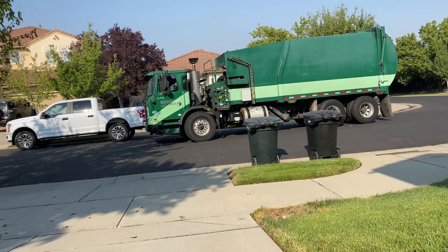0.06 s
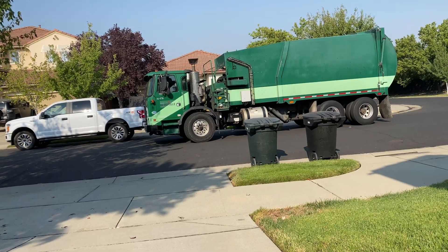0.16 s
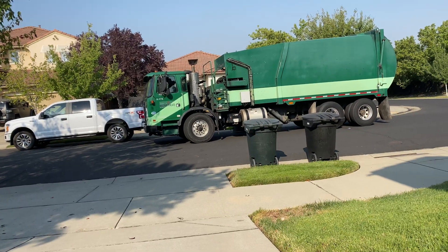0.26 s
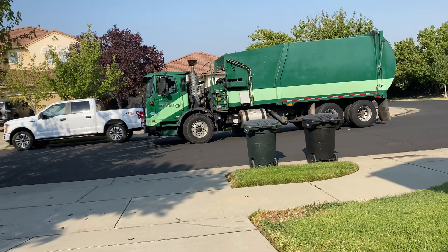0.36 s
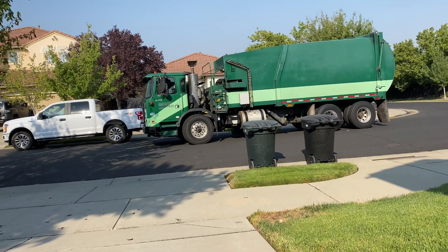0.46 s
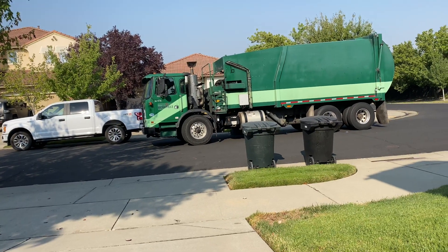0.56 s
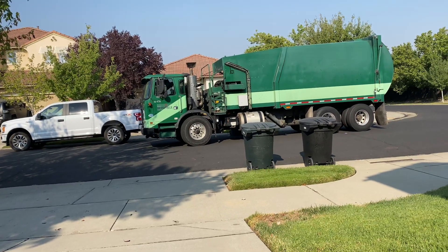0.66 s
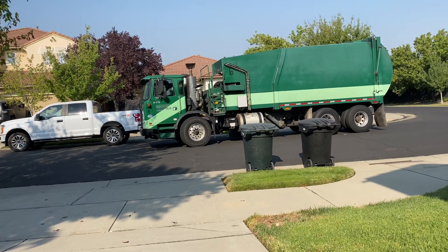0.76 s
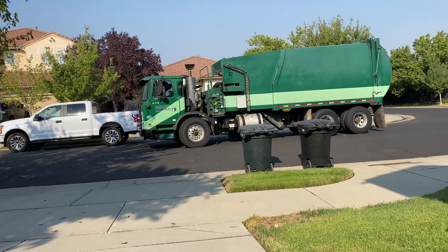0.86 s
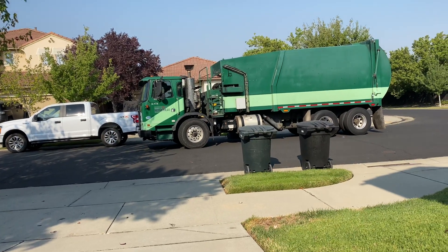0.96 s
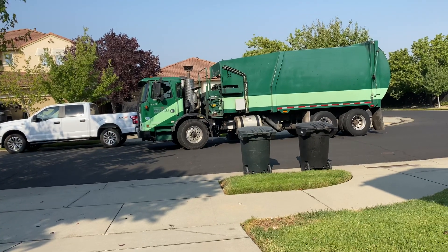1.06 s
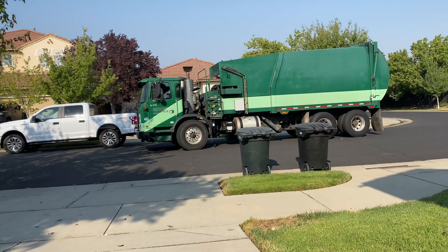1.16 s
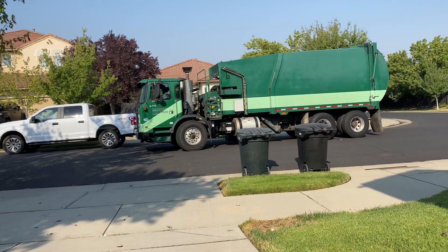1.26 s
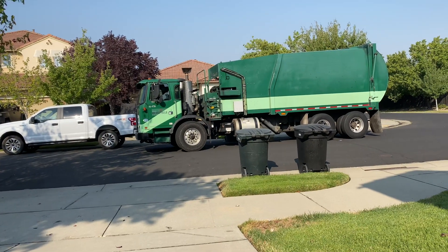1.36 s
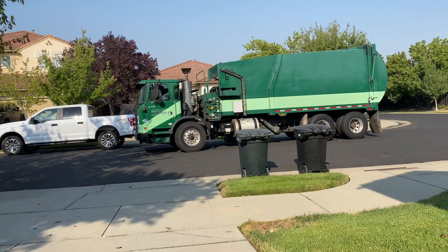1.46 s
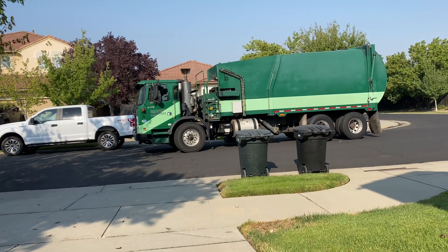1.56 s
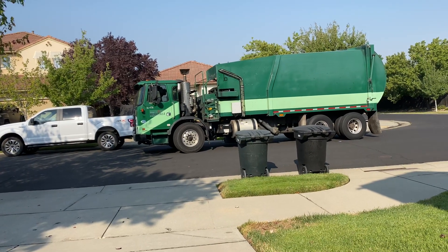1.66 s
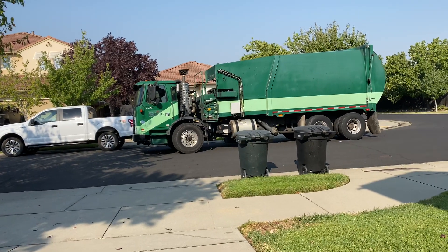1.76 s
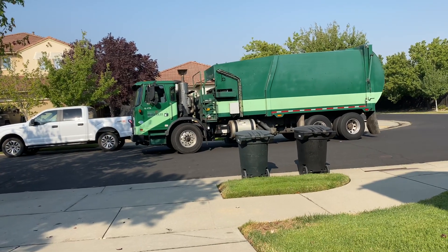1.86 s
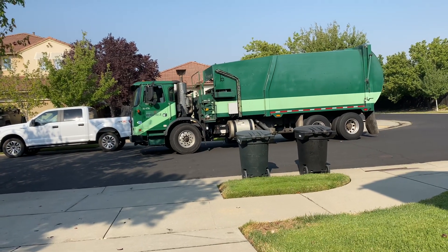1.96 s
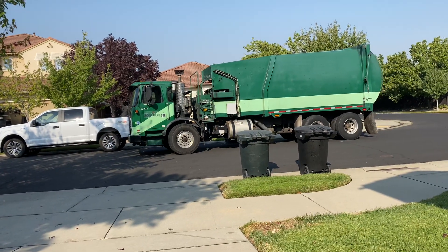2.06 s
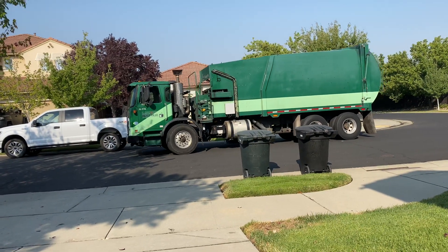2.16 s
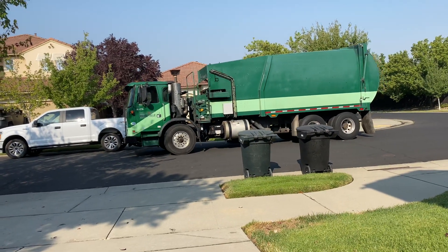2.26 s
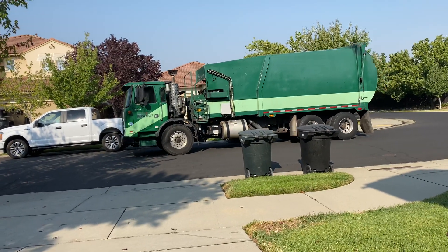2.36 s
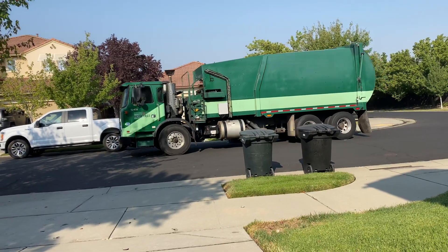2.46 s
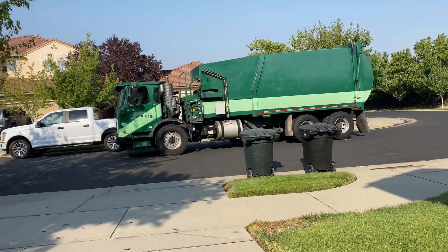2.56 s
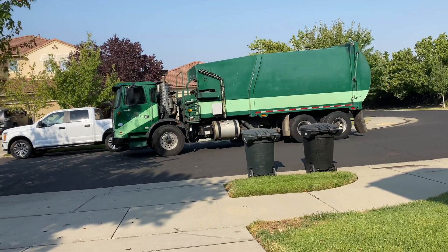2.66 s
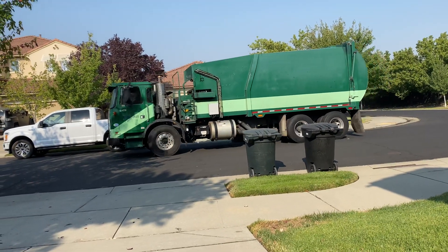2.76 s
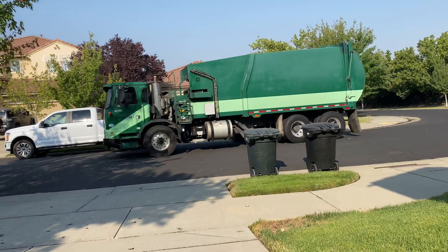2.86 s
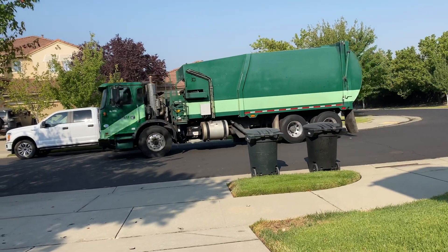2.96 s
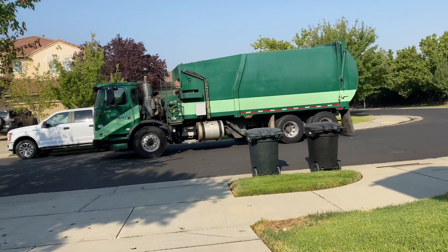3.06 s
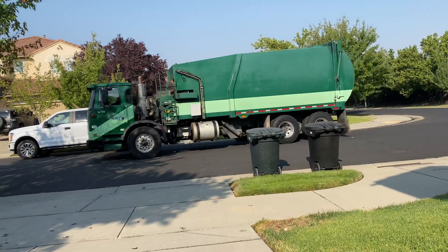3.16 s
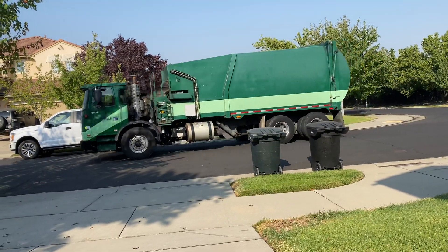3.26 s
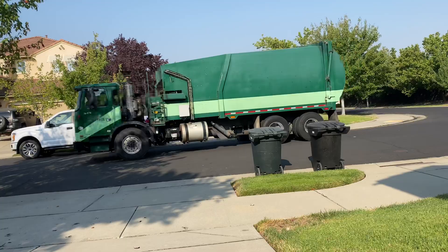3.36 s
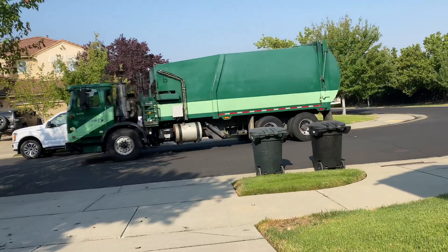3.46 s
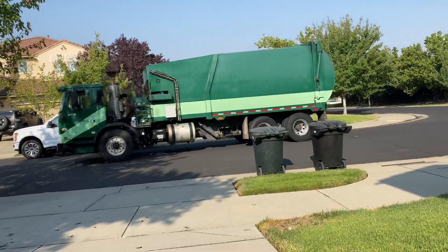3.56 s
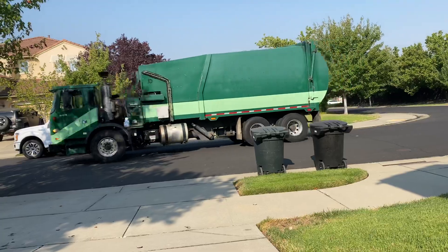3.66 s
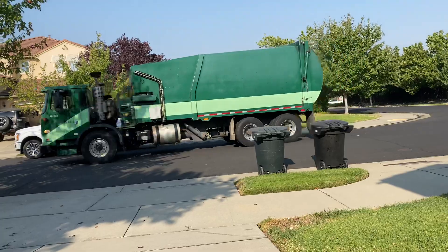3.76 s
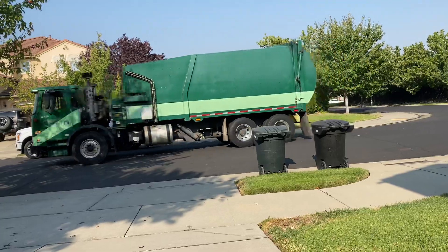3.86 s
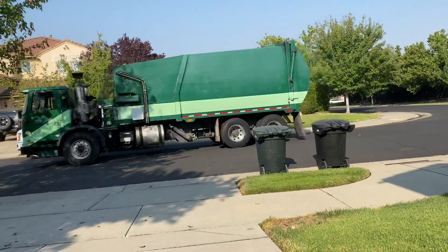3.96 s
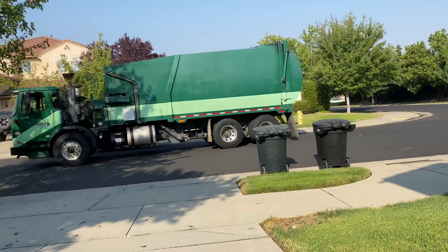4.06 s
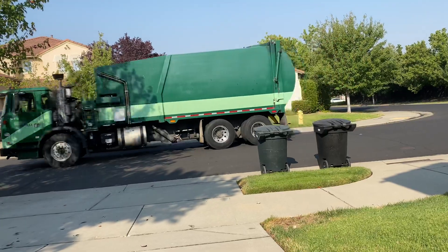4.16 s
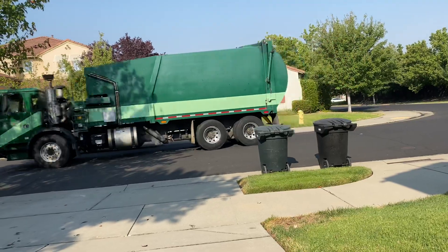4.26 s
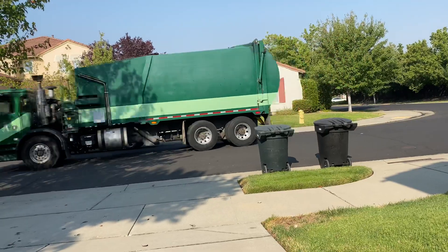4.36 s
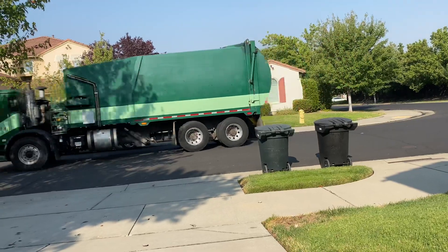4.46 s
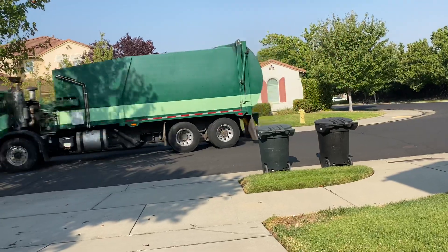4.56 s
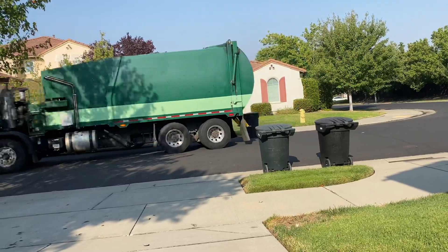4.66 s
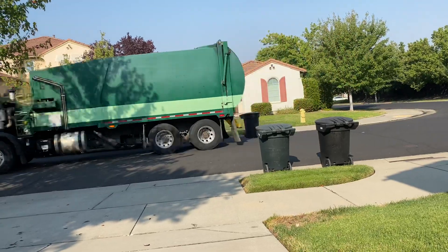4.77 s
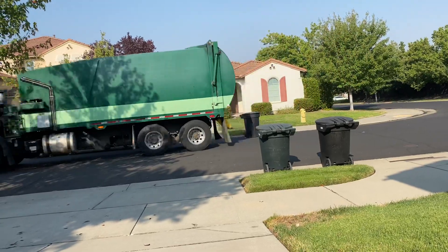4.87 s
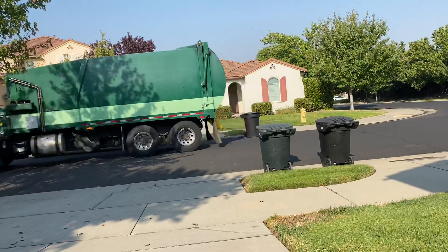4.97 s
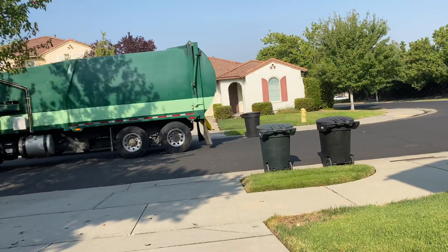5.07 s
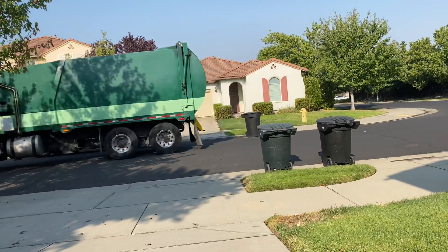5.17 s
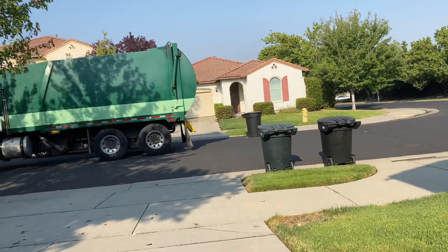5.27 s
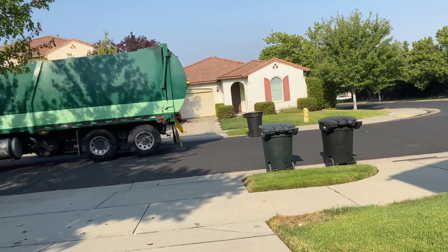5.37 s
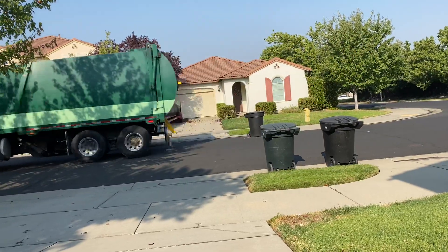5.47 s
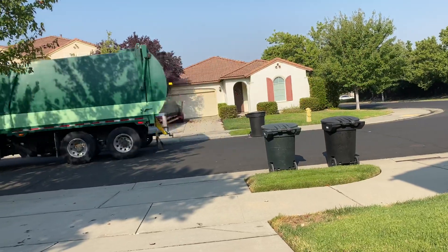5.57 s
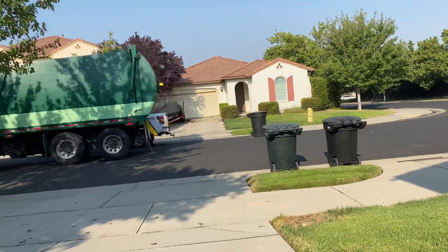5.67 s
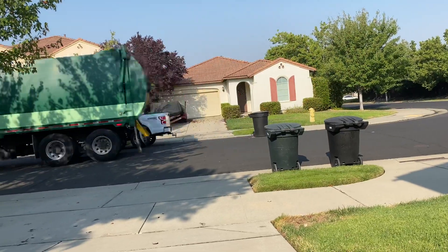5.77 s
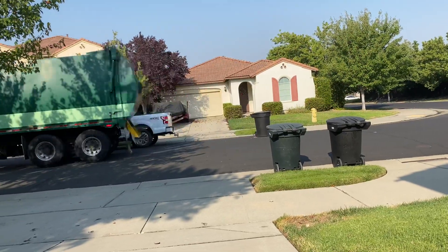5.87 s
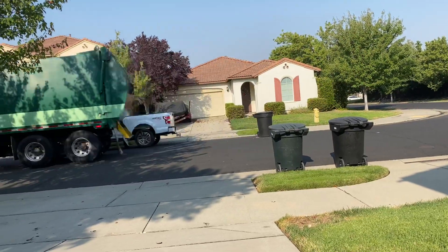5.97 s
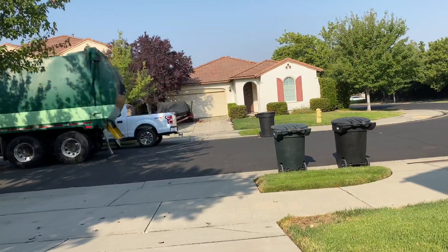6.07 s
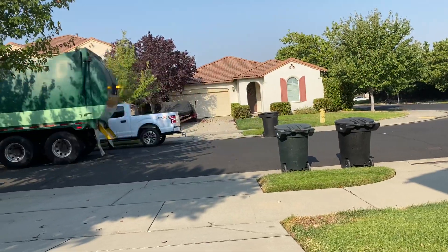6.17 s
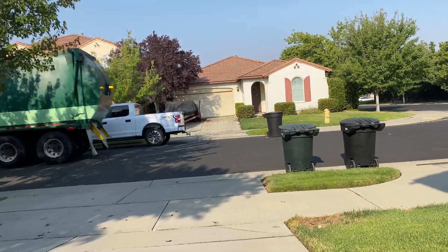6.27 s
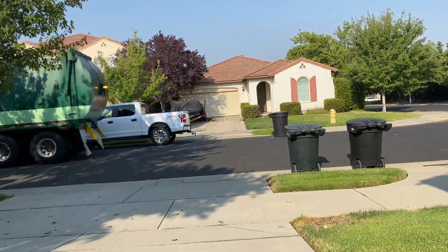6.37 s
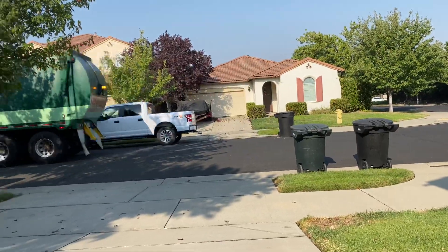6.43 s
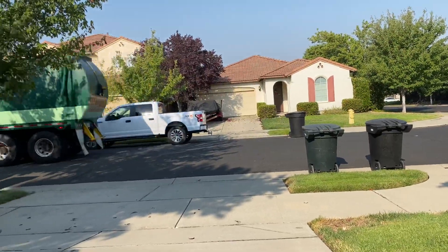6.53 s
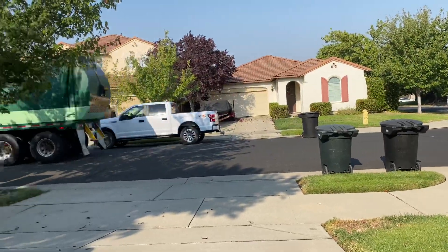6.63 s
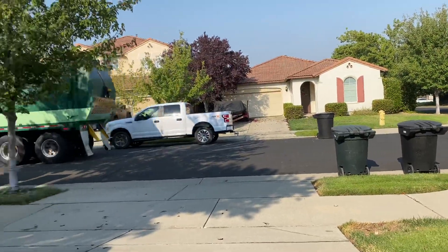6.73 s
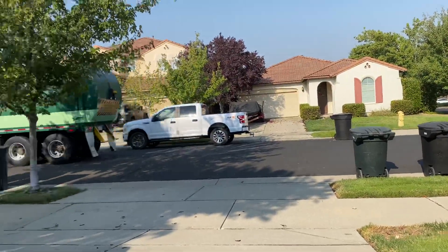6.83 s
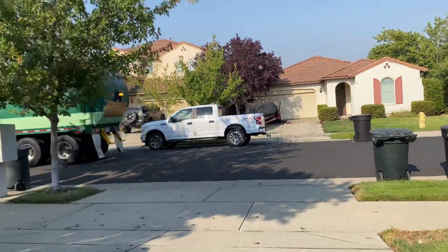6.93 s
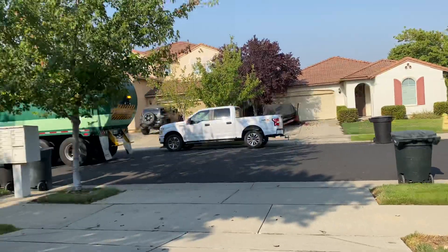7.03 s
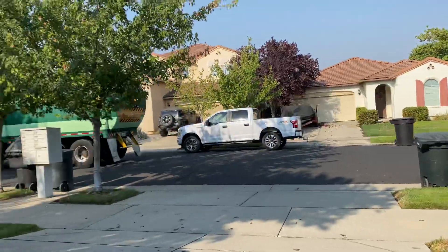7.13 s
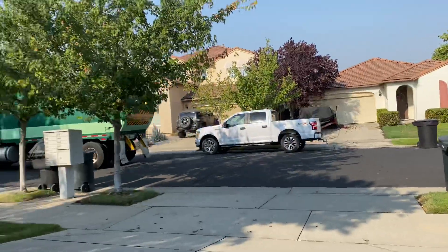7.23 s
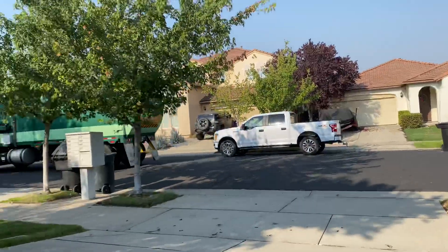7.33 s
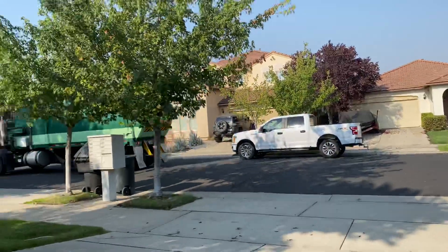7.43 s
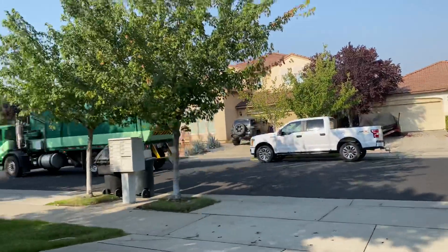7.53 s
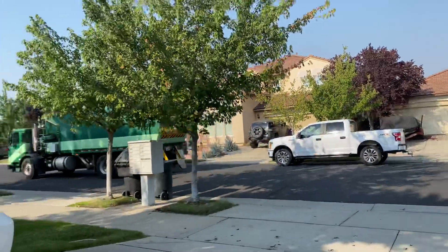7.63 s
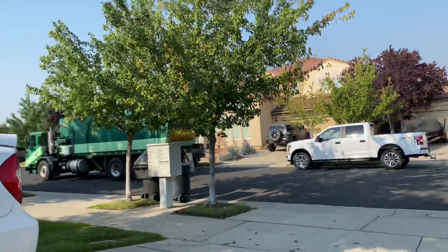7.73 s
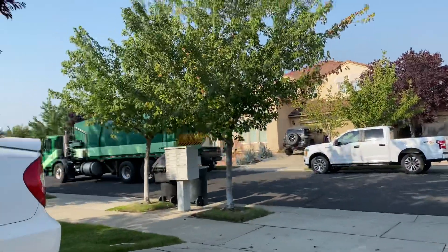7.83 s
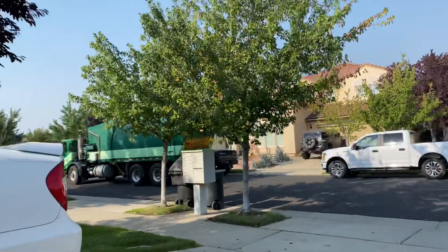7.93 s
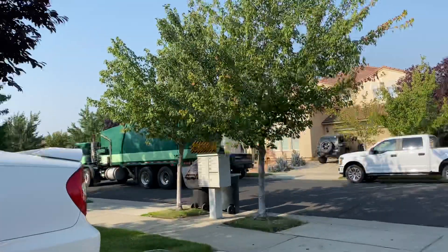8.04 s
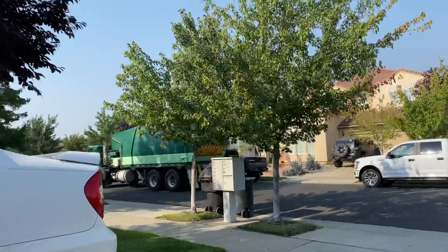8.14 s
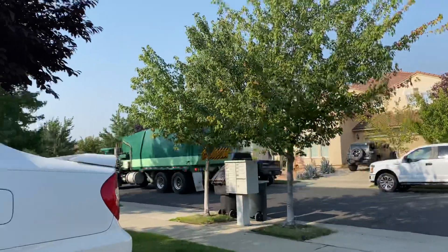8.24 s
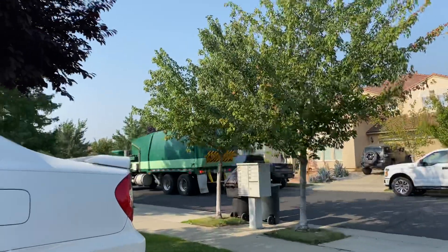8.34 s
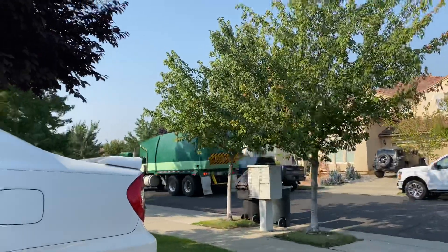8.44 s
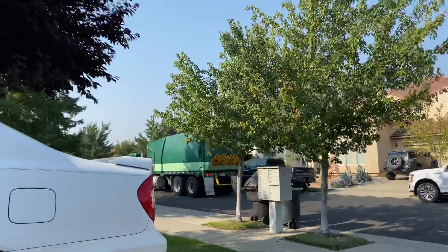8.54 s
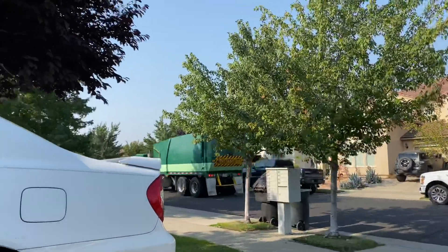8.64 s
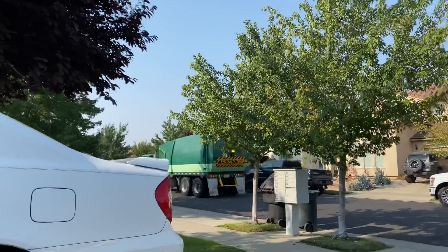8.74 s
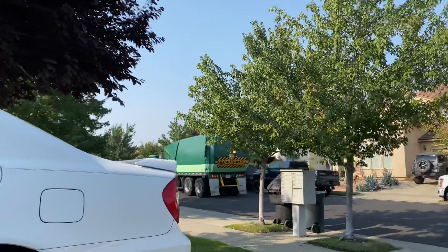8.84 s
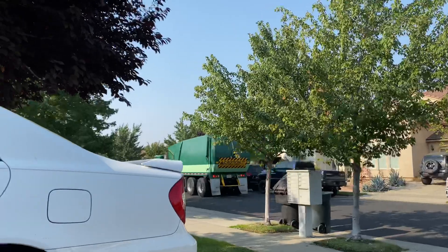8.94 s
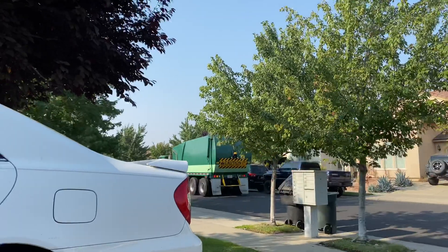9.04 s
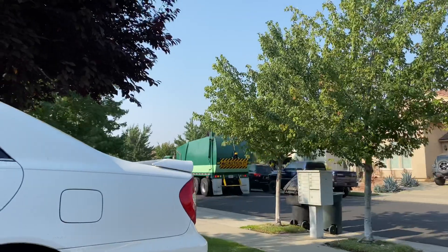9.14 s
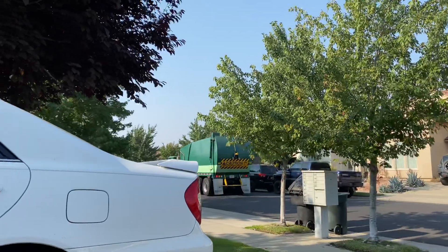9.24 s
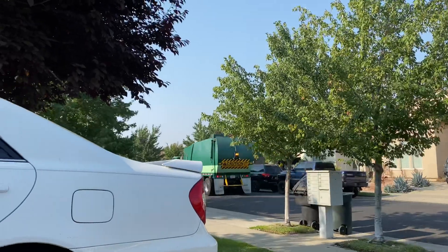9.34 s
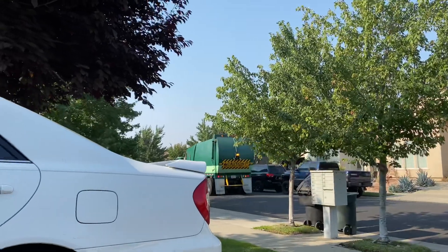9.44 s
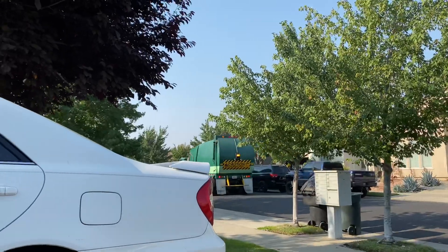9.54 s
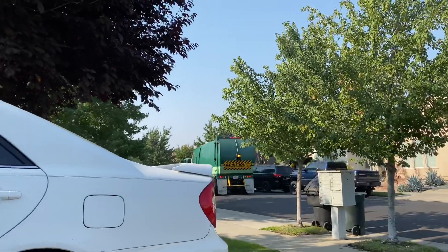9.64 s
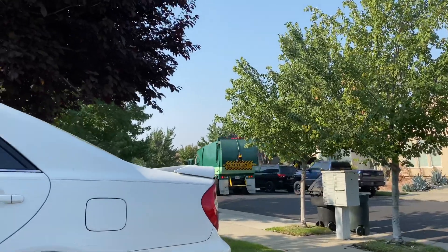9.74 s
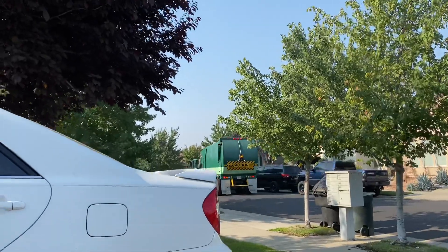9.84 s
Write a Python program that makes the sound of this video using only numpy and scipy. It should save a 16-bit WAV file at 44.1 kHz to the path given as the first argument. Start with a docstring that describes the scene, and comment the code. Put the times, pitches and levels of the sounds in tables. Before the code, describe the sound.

Outdoors, from a driveway, a handheld stereo microphone hears a heavy refuse truck on the opposite side of the road. It idles roughly, lets out air and bangs its lifting arm, then accelerates with a throaty diesel roar, whining hums and a faint turbo whistle. After passing left it drops in revs and grows distant, ending in thin brake squeaks and high squeals over a fading, low idle.

```python
"""Across a street, a refuse truck idles, vents its air brakes, bangs its lifting arm, revs past to the left and brakes
further off. Shaft-locked hums from pump and fan ride on exhaust rumble, drone, diesel clatter, fan hiss and fizz, all
noise shaped in spectrum. A turbo whistle follows the boost; short noise bursts clang and thump, and stick-slip makes
the brakes squeal very high at the end. Two close microphone ports hear it with a short diffuse tail of the street."""
import sys
import numpy as np
from scipy import signal
from scipy.fft import rfft, irfft, next_fast_len
from scipy.io import wavfile
from scipy.ndimage import map_coordinates

SR = 44100
rng = np.random.default_rng(int(sys.argv[2]) if len(sys.argv) > 2 else 0)


def nominal_scale(level):
    """Amplitude ratio for a level in decibels (scalar or array-like)."""
    x = np.asarray(level, float) / 20
    return 10 ** x


def wav_out(sig):
    """Save sig, one row per channel (or a flat mono array), as 16-bit PCM at SR to the path in sys.argv[1]."""
    wavfile.write(sys.argv[1], SR, np.round(np.clip(np.atleast_2d(sig).T, -1, 1) * 32767).astype(np.int16))


N = 436587  # length in samples

# crankshaft speed: time_s, turns_per_s
SHAFT_SPEED = [(0, 22.2), (.8, 21.8), (1.1, 23.67), (1.4, 24.26), (1.8, 22.8), (2.7, 21.94), (3.0, 24.75),
               (3.3, 26.67), (3.5, 27.36), (3.8, 27.06), (4.2, 28.89), (4.6, 30.15), (5.1, 31.43),
               (5.8, 32.94), (6.1, 31.84), (6.3, 28.67), (6.6, 26.22), (7.0, 25.71), (7.5, 25.4),
               (7.8, 24.69), (8.1, 22.44), (8.4, 18.05), (8.7, 18.47), (8.95, 15.69), (9.3, 13.13),
               (9.9, 11.89)]
# engine as heard across the street: time_s, load_and_nearness_db (re the loudest moment), screening_db (shift
# in how the body screens the engine bay, positive = less screened: lifts rumble, hiss and fizz, lowers drone;
# each layer weighs both levels by its own law)
ENGINE_STATE = [(0, -17.5, -6), (.75, -17, 5.5), (1.6, -15.5, 1), (2.1, -10.5, -4), (2.6, -7.5, -5.5),
                (3.1, -4.5, -1), (3.6, -2.5, -1), (4.3, -1, -1.5), (4.9, -1.5, -1.5), (5.5, -1.5, -3),
                (5.95, -5.5, -4), (6.3, -12.5, -10), (7.2, -12, -4.5), (7.7, -13, -11), (8.1, -20.5, -10),
                (8.4, -24, -9), (9, -28.5, -5), (9.9, -34.5, -6.5)]
# relative spectra of the noise layers, each brought to rms 1 before its level: frequency_hz, density_db
RUMBLE_SPECTRUM = [(20, -58), (30, -30), (50, -7), (80, -5), (106, 1), (135, -1.5), (175, -3.5),
                   (230, -8.5), (300, -14.5), (500, -65.5)]
DRONE_SPECTRUM = [(100, -32), (180, -2.5), (270, 0.5), (335, -6.5), (420, -5.5), (520, -8.5), (680, -22.5),
                  (1000, -57.5)]
CLATTER_SPECTRUM = [(400, -43), (680, -3), (950, -4), (1150, -1.5), (1300, -5), (1580, -6), (1780, -13.5),
                    (2400, -49.5)]
HISS_SPECTRUM = [(1300, -35), (1850, 0), (2500, 2.5), (3000, -4), (4500, -7.5), (7300, -16.5),
                 (9000, -12.5), (12000, -43)]
FIZZ_SPECTRUM = [(6500, -12), (8500, -8), (10500, -3.5), (12300, -7), (14000, -3.5), (15600, -15),
                 (15900, -69)]
AIR_SPECTRUM = [(500, -30), (1200, -5), (3000, -4.5), (6000, -8.5), (10900, -3.5), (13000, -13),
                (15600, -12), (15900, -60)]
# relative exhaust strength of the six cylinders in firing order: strength_db
CYLINDER_STRENGTHS = [0, -0.5, 0.5, -2.5, 2.5, -1]
# bouts in which the pump works against pressure: start_s, length_s, hum_db
PUMP_BOUTS = [(0.614, 0.75, -28.5), (2.906, .5, -16.5), (3.8, 0.34, -29), (5.157, 0.59, -16.5),
              (5.672, 0.414, -11), (6.1, 0.26, -20.5), (6.68, 0.84, -20.5), (8.25, 0.51, -28.5)]
# the one hold of the fan clutch: start_s, length_s, hum_db (before its waver)
FAN_HOLD = (2.606, 5.3, -25)
# turbo whistle: time_s, pitch_hz, level_db
TURBO_WHISTLE = [(3.5, 9700, -53), (3.9, 10100, -50), (4.3, 10340, -46), (4.9, 10560, -49),
                 (5.4, 10830, -44.5), (5.7, 10950, -52), (6, 10460, -53), (6.3, 9660, -62)]
# the long squeal between 14.5 and 15.4 kHz: time_s, pitch_hz, level_db
LONG_SQUEAL = [(8.57, 14620, -42), (8.62, 14680, -41), (8.7, 15160, -46), (8.77, 15200, -40),
               (8.88, 14520, -39), (9.05, 14700, -42), (9.2, 14900, -44), (9.28, 15370, -42),
               (9.42, 15320, -42), (9.5, 14800, -45), (9.66, 14800, -45), (9.78, 14600, -40),
               (9.9, 14580, -45)]
# other drum modes that break in and die away: start_s, length_s, pitch_hz, glide_hz, level_db
PASSING_SQUEALS = [(8.71, .09, 12880, 100, -48), (8.78, .2, 12100, 50, -41), (8.84, .25, 13720, 50, -50),
                   (9.02, .07, 12200, 50, -48), (9.16, .1, 12880, 20, -49), (9.22, .22, 14850, 50, -47),
                   (9.22, .46, 11550, 300, -37), (9.44, .36, 9950, 300, -62), (9.46, .24, 12950, 0, -52),
                   (9.56, .15, 15100, 250, -50), (9.68, .22, 13720, 250, -48), (9.76, .1, 6900, 250, -64)]
# short metal squeaks: start_s, length_s, pitch_hz, level_db (of the first partial), overtone_db (re first)
METAL_SQUEAKS = [(1.695, .1, 1610, -37, -26), (8.455, .08, 2300, -34.5, -8.5), (8.54, .07, 1915, -48, -25),
                 (8.633, .1, 2240, -51, -20), (8.85, .05, 2460, -49, -20), (9.301, .17, 2860, -55, -5)]
# short noise bursts and thumps, most from arm and panels, the one at 3.9 s a spit of air:
# start_s, level_db (before the gains below), thump_db (re level_db), decay_s (of the burst, to -60 dB)
BURSTS = [(.423, -26.5, -5, 0.56), (0.908, -21.5, -9, 0.13), (0.915, -26.5, 20.5, 0.18),
          (.932, -21.5, 16.5, 0.18), (0.946, -19, 10.5, 0.097), (0.959, -18, 13.5, 0.12),
          (.977, -25, 6, 0.33), (1.271, -30, -1.5, 0.3), (3.903, -10, -8, 0.1), (4.008, -25.5, 18, 0.25),
          (4.047, -22, 19.5, 0.24)]
# resonances of the steel body: pitch_hz, width_hz, relative_gain_db
PANEL_MODES = [(103.7, 8, 3.5), (139.3, 15, -5), (169, 17, -2.5), (260, 27, -10.5)]
# filter of the noise bursts: frequency_hz, gain_db
BURST_RESPONSE = [(300, 15), (700, 0.5), (1200, 7.5), (1900, 1.5), (2700, 0.5), (5000, -8.5), (8000, -14),
                  (15600, -31), (15900, -71)]
# brake air let out: start_s, rise_s, hold_s (from the start until it dies), level_db, decay_s (to -60 dB)
AIR_VENTS = [(.4, .035, 0.052, -39.5, 1.2), (1.19, 0.055, 0.2, -34.5, 0.16),
             (3.888, .02, 0.019, -31.5, .08)]
# scatter returned by the street: frequency_hz, gain_db
STREET_SCATTER = [(50, -29), (400, -11.5), (680, -2), (1100, -10.5), (1900, -1), (2500, -6), (4500, -1),
                  (6000, -2), (7800, -5.5), (15000, -10.5)]
# bearing of the truck: time_s, left_lead_samples (for the middle band)
LEFT_LEAD = [(0, 0), (1.7, .5), (3.2, 2.5), (4.2, 7.5), (5.7, 11), (6.9, 13), (7.8, 6.5), (8.7, 1),
             (9.9, -0.5)]
# level tilt between the ports: frequency_hz, left_minus_right_db
PORT_TILT = [(60, 0.6), (250, -2.5), (680, -5.5), (1600, -2), (2100, -2), (3200, 2.5), (4300, 2.1),
             (5900, 4), (8000, 1)]
# phase between left and right over frequency: frequency_hz, left_lead_rad
PORT_PHASE = [(20, 0), (450, -0.54), (700, 1.22), (1100, 0.5), (1700, 1.19), (2100, 0.65), (3400, 1.36),
              (4300, 0.5), (5400, 1.5), (6000, -1.74), (7000, 0.5), (7800, -np.pi), (8900, -np.pi),
              (10300, -2 * np.pi), (11600, -2 * np.pi), (12600, -9), (14200, -9), (14900, -4 * np.pi)]

# layer laws: level_db (at full load), db_per_db_of_load, db_per_db_of_screening
RUMBLE_LAW, DRONE_LAW, CLATTER_LAW = (-18, 0.34, 0.39), (-17, 0.84, -0.36), (-22.5, 1, 0.035)
HISS_LAW, FIZZ_LAW = (-29, 0.79, 0.28), (-42, 0.62, 0.7)
PUMP_RISE_S, PUMP_DROP_S, PUMP_LAW = 0.32, 0.049, (-31, 0.63, -1.17)  # the law holds between bouts too
FAN_RISE_S, FAN_DROP_S, FAN_IDLE_DB, FAN_WAVER_DB = 0.36, 0.24, -42, 2.5
FOURTH_DB = -9  # fan hum at four a turn, re that at eight
SQUEAL_RISE_S, SQUEAL_DROP_S, SQUEAL_DIES_DB = 0.02, 0.02, 16
SQUEAK_GLIDE = 0.033  # share by which a squeak rises
THUMP_DB, BURST_DB = 52.5, 5  # gains of the thumps and of the noise bursts


def unit(x):
    """Scale to rms 1."""
    return x / np.sqrt(np.mean(x ** 2) + 1e-20)


def along(points, hz):
    """Read (frequency_hz, value) points on a log frequency axis."""
    f, v = np.transpose(points)
    return np.interp(np.log(hz + 1), np.log(f + 1), v)


def curves(rows):
    """One value per sample for each column after the time."""
    s, *cols = np.transpose(rows)
    return [np.interp(np.arange(N) / SR, s, c) for c in cols]


def fade(rows, edge_s):
    """1 while a table lasts, with a ramp of edge_s before and after."""
    t = np.arange(N) / SR
    inside = np.minimum(t - rows[0][0], rows[-1][0] - t)
    return np.clip(inside / edge_s + 1, 0, 1)


def bout(start_s, length_s, rise_s, drop_s):
    """Rises towards 1 from the start, holds, and drops after its length."""
    t = np.arange(N) / SR - start_s
    return np.clip(np.minimum(t / rise_s, (length_s - t) / drop_s + 1), 0, 1)


def wobble(rate):
    """A smooth random curve, rate knots a second."""
    knots = rng.standard_normal(int(N * rate / SR) + 4)
    return map_coordinates(knots, [np.arange(N) * rate / SR], order=2)


def filtered(x, response):
    """Apply a complex response of frequency."""
    m = next_fast_len(x.shape[-1] + 8192)
    spectrum = rfft(x, m) * response(np.fft.rfftfreq(m, 1 / SR))
    return irfft(spectrum, m)[..., :x.shape[-1]]


def coloured(x, spectrum):
    """Shape by a spectrum and bring to rms 1."""
    return unit(filtered(x, lambda hz: nominal_scale(along(spectrum, hz))))


def tone(hz, blur_hz, flutter_db, rate):
    """An unsteady sine of rms 1 before its flutter."""
    phase = 2 * np.pi * np.cumsum(hz + blur_hz * wobble(rate)) / SR
    return np.sqrt(2) * np.sin(phase) * nominal_scale(flutter_db * wobble(rate))


def engine():
    """Three firings a turn drive exhaust and clatter; pump and fan hum in step with the shaft."""
    speed, = curves(SHAFT_SPEED)
    load_db, screening_db = curves(ENGINE_STATE)

    def level(law):
        return nominal_scale(law[0] + law[1] * load_db + law[2] * screening_db)

    firings = np.cumsum(3 * speed) / SR
    number = firings.astype(int)
    uneven_db = 3.0 * rng.standard_normal(number[-1] + 1)[number]
    strength = nominal_scale(np.take(CYLINDER_STRENGTHS, number % 6) + uneven_db)
    pulses = unit(np.diff(number, prepend=0) * strength)
    gate = strength * (1.0 + np.exp(-4 * (firings % 1)))  # each firing opens a burst of noise
    noise = rng.standard_normal((5, N))
    waver = wobble(6)  # a slow random wavering shared by clatter, hiss and fizz

    rumble = level(RUMBLE_LAW) * coloured(0.39 * pulses + noise[0], RUMBLE_SPECTRUM)
    drone = level(DRONE_LAW) * coloured(0.27 * pulses + noise[1], DRONE_SPECTRUM)
    clatter = level(CLATTER_LAW) * nominal_scale(0.27 * waver) * coloured(gate ** 0.3 * noise[2], CLATTER_SPECTRUM)
    hiss = level(HISS_LAW) * nominal_scale(0.24 * waver) * coloured(gate ** 0.31 * noise[3], HISS_SPECTRUM)
    fizz = level(FIZZ_LAW) * nominal_scale(0.32 * waver) * coloured(noise[4], FIZZ_SPECTRUM)
    hums = pump_hum(speed, level(PUMP_LAW)) + fan_hum(speed)
    return rumble + drone + clatter + hiss + fizz + hums


def pump_hum(speed, idle_level):
    """Nine cycles a turn hum with the load, and louder in bouts of pumping against pressure."""
    bouts = [nominal_scale(db) * bout(s, length, PUMP_RISE_S, PUMP_DROP_S) for s, length, db in PUMP_BOUTS]
    level = idle_level + np.max(bouts, axis=0)
    return level * tone(9 * speed, blur_hz=0.41, flutter_db=0.3, rate=15)


def fan_hum(speed):
    """The fan hums at eight and four a turn, louder while its clutch holds."""
    start_s, length_s, hum_db = FAN_HOLD
    held = nominal_scale(hum_db + FAN_WAVER_DB * wobble(3.02)) * bout(start_s, length_s, FAN_RISE_S, FAN_DROP_S)
    level = nominal_scale(FAN_IDLE_DB) + held
    eighth = tone(8 * speed, blur_hz=0.41, flutter_db=0.6, rate=15)
    fourth = nominal_scale(FOURTH_DB) * tone(4 * speed, blur_hz=0.66, flutter_db=3.0, rate=6)
    return level * (eighth + fourth)


def turbo():
    """A thin, breathy whistle follows the boost."""
    hz, db = curves(TURBO_WHISTLE)
    return fade(TURBO_WHISTLE, 0.15) * nominal_scale(db) * tone(hz, blur_hz=29.7, flutter_db=4, rate=130)


def brakes():
    """Stick-slip of the shoes sets rough, very high modes singing, and a few low squeaks with overtones."""
    hz, db = curves(LONG_SQUEAL)
    out = fade(LONG_SQUEAL, 0.012) * nominal_scale(db) * tone(hz, blur_hz=85, flutter_db=4, rate=130)
    for s, length, hz, glide_hz, db in PASSING_SQUEALS:
        progress = np.clip((np.arange(N) / SR - s) / length, 0, 1)
        shape = bout(s, length, SQUEAL_RISE_S, SQUEAL_DROP_S) * nominal_scale(db - SQUEAL_DIES_DB * progress ** 2)
        out += shape * tone(hz + glide_hz * progress, blur_hz=66.6, flutter_db=2.5, rate=130)
    for s, length, hz, db, over_db in METAL_SQUEAKS:
        progress = np.linspace(0, 1, round(length * SR))
        n = len(progress)
        pitch = hz * (1 + SQUEAK_GLIDE * progress) + 28 * wobble(102)[:n]
        phase = 2 * np.pi * np.cumsum(pitch) / SR
        ring = np.sin(phase) + nominal_scale(over_db) * np.sin(2 * phase) + nominal_scale(2 * over_db) * np.sin(3 * phase)
        shape = nominal_scale(db + 2.5 * wobble(107)[:n]) * np.sin(np.pi * progress) ** 0.69
        out[round(s * SR):][:n] += shape * ring
    return out


def panels(f):
    """Response of the steel body: resonances of alternating sign, rolled off above 350 Hz."""
    modes = 0
    for k, (centre, width, db) in enumerate(PANEL_MODES):
        resonance = 1j * f * width / (centre * centre - f * f + 1j * f * width)
        modes = modes + (-1) ** k * nominal_scale(db) * resonance
    return modes / (1 + 1j * f / 350) ** 2


def bursts_and_thumps():
    """Each event is a short dying burst of noise and a push that thumps through the panel resonances."""
    t = np.arange(SR // 3) / SR
    bursts, pushes = np.zeros(N), np.zeros(N)
    for s, db, thump_db, decay_s in BURSTS:
        envelope = nominal_scale(db + BURST_DB - 60 * t / decay_s) * (1 - np.exp(-t / 0.0038))
        rattle = nominal_scale(3.1 * wobble(250)[:len(t)])  # fast random wavering
        bursts[round(s * SR):][:len(t)] += envelope * rattle * rng.standard_normal(len(t))
        pushes[round(s * SR)] = nominal_scale(db + thump_db + THUMP_DB)
    noise = filtered(bursts, lambda hz: nominal_scale(along(BURST_RESPONSE, hz)))
    return noise + filtered(pushes, panels)


def air():
    """Jets of brake air, sputtering a little, dying as the pressure falls."""
    t = np.arange(N) / SR
    flow = np.zeros(N)
    for s, rise, hold, db, decay_s in AIR_VENTS:
        dying = nominal_scale(db - 60 * np.maximum(t - s - hold, 0) / decay_s)
        flow += np.clip((t - s) / rise, 0, 1) * dying
    return flow * nominal_scale(1.1 * wobble(42)) * coloured(rng.standard_normal(N), AIR_SPECTRUM)


def street(x):
    """House fronts return a short diffuse tail, different at each port and always changing."""
    hop = SR // 5  # a fresh pair of tails every 0.2 s, crossfaded
    starts = np.arange(-hop, N, hop)
    padded = np.pad(x, (hop, 2 * hop))
    blocks = padded[starts[:, None] + hop + np.arange(2 * hop)] * np.hanning(2 * hop)
    t = np.arange(2 * hop) / SR
    tails = nominal_scale(-60 * t / 0.57) * rng.standard_normal((2, len(starts), 2 * hop))
    parts = signal.fftconvolve(blocks[None], tails / np.linalg.norm(tails[0, 0]), axes=2)
    wet = np.zeros((2, N + 6 * hop))
    for k in range(len(starts)):
        wet[:, k * hop:][:, :4 * hop - 1] += parts[:, k]
    return filtered(wet[:, hop:N + hop], lambda hz: nominal_scale(along(STREET_SCATTER, hz)))


def port_response(hz):
    """Left and right differ in level and in phase over frequency, half the difference applied to each."""
    tilt = nominal_scale(np.outer([0.5, -0.5], along(PORT_TILT, hz)))
    return tilt * np.exp(np.outer([0.5j, -0.5j], along(PORT_PHASE, hz)))


def scene():
    """The truck's bearing delays the middle band between the ports, which also differ in level and phase."""
    truck = engine() + turbo() + brakes() + bursts_and_thumps() + air()
    middle_share = [(500, 0.38), (750, 0.56), (5300, 0.96), (6000, 0)]  # frequency_hz, share
    middle = filtered(truck, lambda hz: along(middle_share, hz))
    lead, = curves(LEFT_LEAD)
    places = [np.arange(N) + side * lead / 2 for side in (1, -1)]  # left, right
    moved = np.array([map_coordinates(middle, [place], mode="nearest") for place in places])
    return filtered(truck - middle + moved + street(truck), port_response)


def roll_off(x):
    """The treble ends steeply here."""
    return signal.sosfilt(signal.butter(12, 16940, fs=SR, output="sos"), x)


def record(dry):
    """The recorder rounds off the highest peaks, towards 0.95 of full scale."""
    rounded = dry / (1 + np.abs(dry / 0.95) ** 6) ** (1 / 6)
    return roll_off(rounded)


dry = scene()
out = record(dry)
wav_out(out)
```